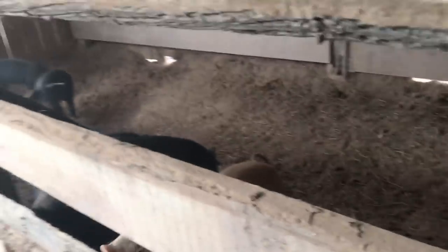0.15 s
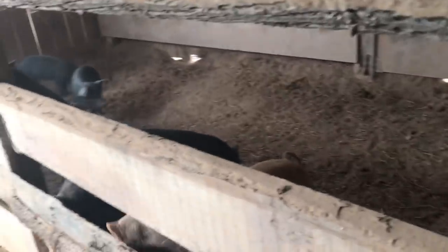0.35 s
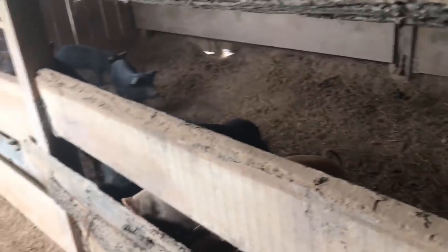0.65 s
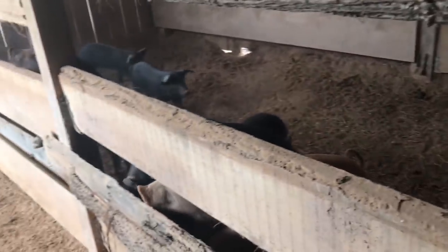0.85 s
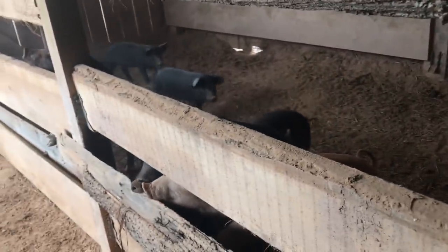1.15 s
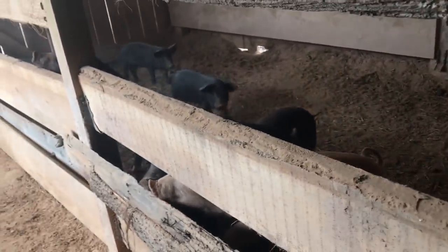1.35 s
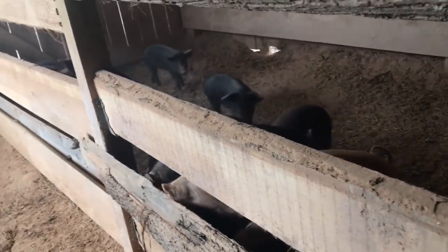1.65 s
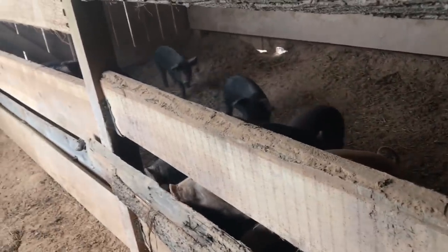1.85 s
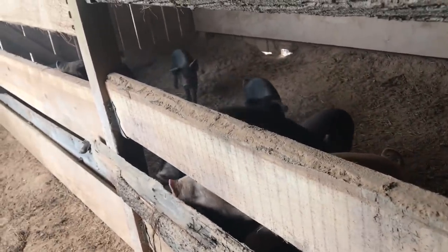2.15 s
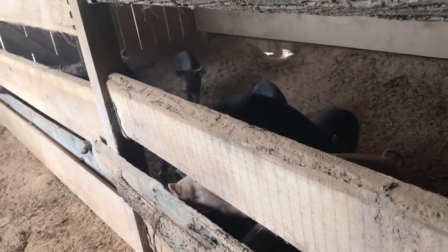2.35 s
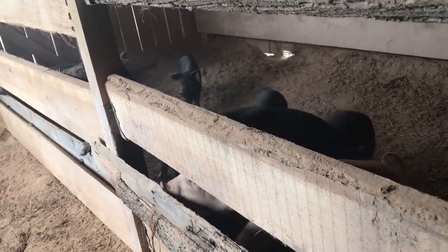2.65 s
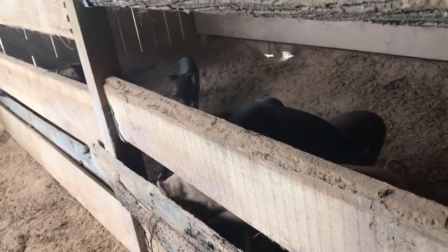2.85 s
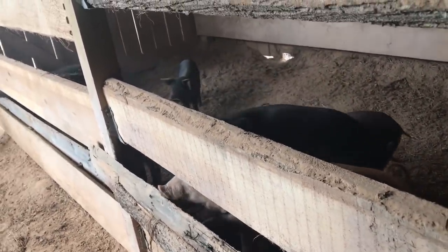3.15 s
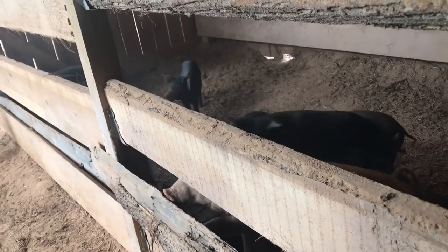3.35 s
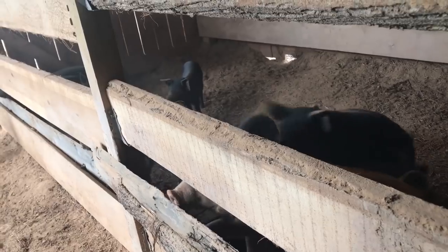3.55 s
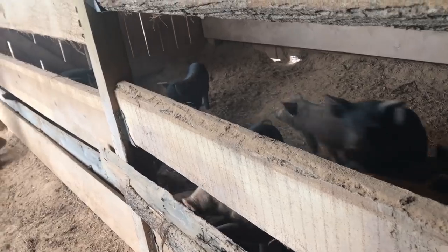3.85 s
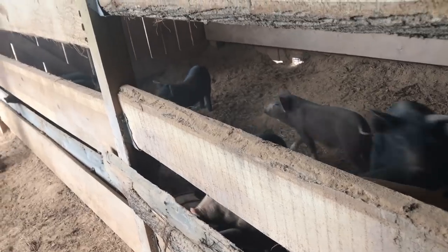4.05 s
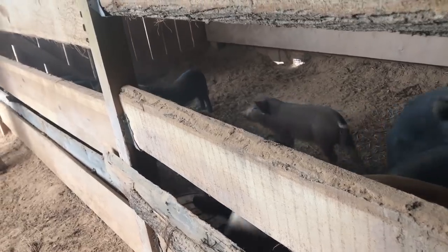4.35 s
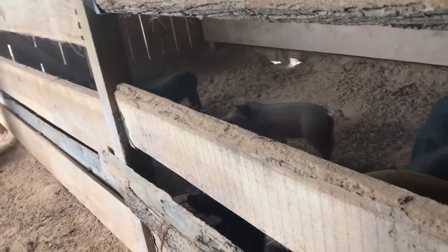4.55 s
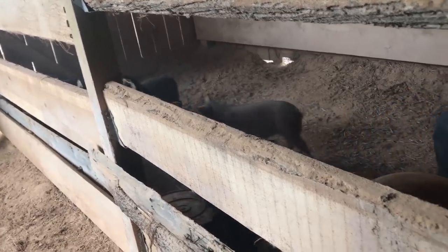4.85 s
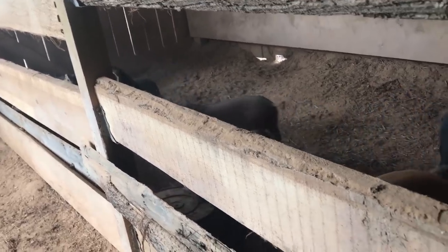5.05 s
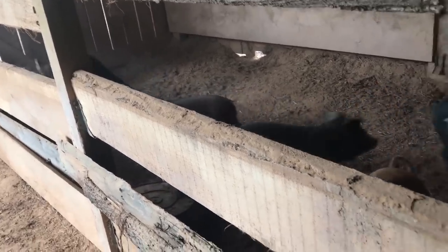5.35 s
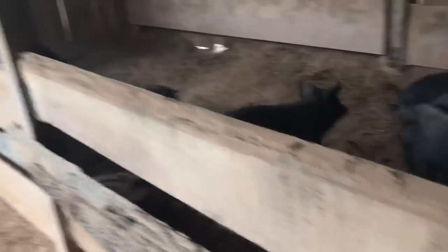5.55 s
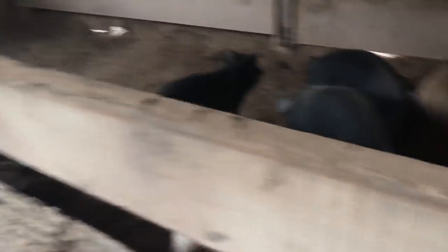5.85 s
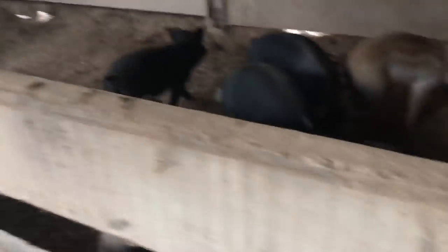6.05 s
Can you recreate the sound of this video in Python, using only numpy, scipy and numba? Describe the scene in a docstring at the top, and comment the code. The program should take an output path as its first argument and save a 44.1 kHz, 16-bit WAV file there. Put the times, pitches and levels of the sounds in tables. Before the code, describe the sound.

Several pigs in a roofed plank pen with a dirt floor. Low closed-mouth grunts and short creaky piglet grunts come in uneven bursts, with small gaps. Around four seconds the piglets whine and cry in a cluster; near five seconds one gives a quick rising squeal. Then boards are knocked hard. Trotters scuff dry dirt. A phone over the fence catches bassy gusts and faint hiss.

```python
"""Dark grunts, a gust on the microphone and a piglet's short creak open over a faint farmyard.
The scene is a roofed plank pen with a dirt floor, heard through a phone held over the fence.
Vocal-fold snaps and puffs ring nose and mouth: creaking grunts speed up to a tone, cries glide, two squeals arc.
Filtered noise makes trotters scuffing dirt, knocked boards, a shuffling herd, hiss and gusts; a thin sine squeaks.
Quick plank returns and a short noise tail put the pigs, boards and dirt in the pen."""
import sys
import numpy as np
from scipy import signal
from scipy.fft import rfft, irfft
from scipy.io import wavfile
from scipy.ndimage import uniform_filter1d
from numba import njit

SR = 44100
rng = np.random.default_rng(int(sys.argv[2]) if len(sys.argv) > 2 else 0)


def generate_wav(signal):
    """Clip the signal to [-1, 1] and save it as 16-bit WAV at the path in sys.argv[1]."""
    frames = np.transpose(np.atleast_2d(signal))
    scaled = np.clip(frames, -1, 1) * 32767
    pcm = np.round(scaled).astype(np.int16)
    wavfile.write(sys.argv[1], SR, pcm)


N = 273265
T = np.arange(N) / SR


def undb(db):
    """Decibels to gain."""
    return 10 ** (np.asarray(db) / 20)


def curves(rows, t):
    """The columns of a table, drawn as straight lines between its times and read at times t."""
    s, *columns = np.transpose(rows)
    return [np.interp(t, s, c) for c in columns]


def unit(x):
    """Scale to rms 1."""
    return x / np.sqrt(np.mean(x ** 2) + 1e-20)


def smooth(x, seconds):
    """Triangular moving average, two box averages in a row."""
    k = max(int(seconds * SR), 1)
    return uniform_filter1d(uniform_filter1d(x, k), k)


def steady(x, seconds=0.022):
    """Hold the slow level near 1 and keep the single pulses."""
    slow_power = np.abs(smooth(x ** 2, seconds))
    floor = np.mean(x ** 2) / 20 ** 2
    return x / np.sqrt(slow_power + floor)


def walk(n, rate):
    """Slow random drift with rms 1; a higher rate (Hz) drifts faster."""
    return unit(smooth(rng.standard_normal(n), 1 / rate))


def ramp(t, start, length):
    """Rise from 0 to 1 over a length of time."""
    return np.clip((t - start) / max(length, 1 / SR), 0, 1)


def add(out, t, x):
    """Mix x in from the first of its times t."""
    i = max(int(round(t[0] * SR)), 0)
    out[i:i + len(x)] += x[:max(N - i, 0)]


@njit
def band(x, hz, q):
    """State-variable band-pass whose centre moves; gain 1 at the centre."""
    y, b, low = np.empty(len(x)), 0., 0.
    for i in range(len(x)):
        g = np.tan(np.pi * min(hz[i] / SR, .45))
        v = (b + g * (x[i] - low)) / (1 + g * (g + 1 / q))
        b, low, y[i] = 2 * v - b, low + 2 * g * v, v / q
    return y


def resonate(x, modes, tuning=1, tilt_db=0):
    """Parallel resonances, each applied twice for dark valleys; the tilt (dB an octave) weights the upper ones."""
    out = 0
    for hz, width, db in modes:
        centre = np.ones(len(x)) * hz * tuning
        q = np.mean(hz) / width * np.sqrt(np.sqrt(2) - 1)  # broadened, as two passes narrow the band
        gain = undb(db + tilt_db * np.log2(hz / modes[0][0]))
        out = out + gain * band(band(x, centre, q), centre, q)
    return out


# colour of the distant farmyard noise: f/Hz, relative level/dB
YARD_COLOUR = [(20, -39), (50, 7.5), (120, -1.5), (330, -32), (600, -4), (950, -2), (1400, -5), (3000, -10),
               (6000, -18.5), (11000, -36), (15500, -54)]


def distant_yard(far_db=-66):
    """Distant farmyard: steady noise shaped in its spectrum."""
    hz, db = np.transpose(YARD_COLOUR)
    bin_hz = np.arange(N // 2 + 1) * SR / N
    colour = undb(np.interp(np.log(bin_hz + 1), np.log(hz), db))
    return unit(irfft(rfft(rng.standard_normal(N)) * colour, N)) * undb(far_db)


SWELL_ATTACK_S, SWELL_FADE_DB = 0.0025, 18.5  # quick rise; loss over the swell's listed length


def swells(rows, steady_db):
    """Gain of a steady noise with swells that rise quickly and die away; their powers add."""
    power = undb(steady_db) ** 2
    for start, length, db in rows:
        age = np.maximum(T - start, 0)
        rise = np.minimum(age / SWELL_ATTACK_S, 1)
        power = power + (rise * undb(db - SWELL_FADE_DB * age / length)) ** 2
    return np.sqrt(power)


# gusts on the microphone: start t/s, length t/s, level/dB
GUSTS = [(0, 1.7, -48.5), (.55, 0.99, -61), (2.15, 0.15, -50.5), (5.398, 0.29, -41), (5.75, 1.3, -52)]


def gusts(air_db=-81, gust_db=3):
    """Air buffets the microphone: bass noise with quick swells and a random flutter."""
    rumble = unit(resonate(rng.standard_normal(N), [(41, 28, -24), (77.0, 145, 16)]))
    return rumble * swells(GUSTS, air_db) * undb(gust_db * walk(N, 8.3))


# swells of faint high hiss: start t/s, length t/s, level/dB
HISS_SWELLS = [(2.265, 0.33, -60.5), (2.5, 1, -65), (2.82, 0.19, -62.5), (3.24, 0.26, -63),
               (4.85, 0.68, -65), (5.42, 0.3, -56.5)]


def hiss(hiss_db=-74):
    """Faint hiss: very broad high noise that swells now and then."""
    return unit(resonate(rng.standard_normal(N), [(6100, 13600, 0)])) * swells(HISS_SWELLS, hiss_db)


# the air puff after each snap: longest decay (s), and longest share of a cycle
PUFF_S, PUFF_SHARE = .0026, .24


def folds(t, start, hz, rough, jitter=.15, shimmer_db=4.5):
    """Uneven snaps of the vocal folds, and the short puff of turbulent air that follows each."""
    rate = hz * np.exp(jitter * rough * walk(len(t), 300))
    phase = np.cumsum(rate * (t >= start)) / SR
    size = undb(shimmer_db * rough * walk(len(t), 166))
    snaps = np.diff(np.ceil(phase), prepend=0) * size / np.sqrt(hz)
    decay_cycles = np.minimum(PUFF_S * hz, PUFF_SHARE)
    gate = np.exp(-(phase % 1) / decay_cycles) * (t >= start)
    return steady(snaps), steady(gate * size * rng.standard_normal(len(t)))


DARK_ROUGH, DARK_AIR = .26, .3  # roughness 0-1; puffs against snaps
# closed-mouth resonances of the bigger pigs: f/Hz, width f/Hz, relative level/dB
CHEST = [(120, 60, 15), (324, 370, -24), (880, 100, -53)]
# dark grunts: start t/s, loudest t/s, end t/s, first pitch f/Hz, last pitch f/Hz, level/dB
DARK_GRUNTS = [(0, 0.023, .11, 112.5, 98.3, -45), (0.24, 0.334, .37, 111, 108.6, -42),
               (0.098, 0.19, .26, 148.6, 112.6, -39.5), (0.321, 0.406, .48, 188.7, 101.6, -37),
               (0.58, 0.672, .72, 135.3, 97.7, -40.5), (0.966, 1.09, 1.17, 139.6, 111.6, -43),
               (1.245, 1.264, 1.312, 126.6, 115.3, -26.5), (1.323, 1.34, 1.39, 129, 111, -37.5),
               (1.72, 1.754, 1.84, 141.2, 98, -37), (2.182, 2.215, 2.31, 107.9, 96.3, -41.5),
               (3.046, 3.206, 3.3, 109.9, 99.6, -41), (3.297, 3.359, 3.44, 117.4, 104.1, -45.5),
               (3.441, 3.57, 3.6, 131, 113.3, -46), (3.587, 3.6, 3.645, 131.5, 107.5, -30),
               (3.654, 3.803, 3.83, 108, 119, -50.5), (4.201, 4.244, 4.305, 165.2, 144.6, -31.5),
               (4.95, 5.037, 5.27, 94, 98, -44.5), (5.551, 5.597, 5.72, 111, 110.4, -43),
               (6.06, 6.118, 6.24, 147.8, 104.8, -33)]


def big_pigs(fade_db=13):
    """Closed-mouth grunts: mostly falling pitch, nearly all in the lowest resonance."""
    out = np.zeros(N)
    for start, top, end, first_hz, last_hz, db in DARK_GRUNTS:
        t = np.arange(start, end, 1 / SR)
        snaps, puffs = folds(t, start, np.linspace(first_hz, last_hz, len(t)), DARK_ROUGH)
        below_top_db = np.interp(t, [start, top, end], [fade_db, 0, fade_db])
        swell = undb(db - below_top_db) * signal.windows.tukey(len(t), .15)
        add(out, t, steady(resonate(snaps + DARK_AIR * puffs, CHEST)) * swell)
    return out


THROAT_WANDER, COLOUR_FLICKER_DB = .022, 2.2  # rms drift of each centre (fraction) and of its strength


def moving(shapes, centres):
    """Resonances on their paths; each wanders a little and swells or ebbs from moment to moment."""
    modes = []
    for hz, (width, db) in zip(centres, shapes):
        path = hz * (1 + THROAT_WANDER * walk(len(hz), 40.0))
        modes.append((path, width, db + COLOUR_FLICKER_DB * walk(len(hz), 91.0)))
    return modes


SCATTER_S = 0.0018  # the snout and the boards beside it draw each snap out into a short burst
SCATTER_FULL_DB = 6  # below this echo share a piglet is close and its snaps stay sharper


def scatter(x, echo_db):
    """Spread every snap over a few milliseconds, less when the piglet is close, and keep most of its colour."""
    age = np.arange(SR // 50) / SR
    spread_s = SCATTER_S * min(undb(echo_db - SCATTER_FULL_DB), 1) ** 3
    envelope = age * np.exp(-age / spread_s) * undb(-20 * age / age[-1])
    spectrum = rfft(rng.standard_normal(len(age)) * envelope, 4 * len(age))
    burst = irfft(spectrum / np.abs(spectrum) ** .7)[:len(age)]  # flattened spectrum
    return signal.fftconvolve(x, burst / np.linalg.norm(burst))[:len(x)]


# turbulent air against fold snaps at full roughness, in each group of resonances
NOSE_AIR, MOUTH_AIR, STRAIN_AIR = .45, 2.7, 4.2
NOSE_PITCH_HZ, NOSE_LIFT = 140, 0.055  # the nose's fixed-table resonances follow the pitch, by this power
JAW_SHIFT_PER_DB = .001  # a closing jaw lowers the resonances
CREAK_TREMBLE_DB, TONE_TREMBLE_DB = 2.8, 1.1  # rms level tremble at low and at high pitch
# the moving resonances, in path order: width f/Hz, relative level/dB
NOSE = [(135, 1.5)]
MOUTH = [(227, 1.6), (202, 8.8), (264, 7.8), (249, 7.7), (212, 5.4)]
STRAIN = [(330, 5), (350, 2), (380, -2)]
# resonances without a path of their own: f/Hz, width f/Hz, relative level/dB
NOSE_LOW = [(157, 41, -0.5), (357.8, 59, 11.5), (590, 42, -9.5)]
MOUTH_TOP = [(9800, 360, -13.5), (11950, 3400, -18)]
STRAIN_TOP = [(9420, 850, -14), (13550, 1800, -23.5)]
# tongue and jaw move the throat from call to call: t/s, upper nose f/Hz, five mouth f/Hz,
# three strain f/Hz, extra ring of the fourth mouth resonance level/dB
THROAT_PATHS = [ (.29, 880, 1840, 2600, 3200, 3990, 4700, 5700, 5700, 7200, 3),
                (.52, 880, 1860, 2640, 3220, 4020, 4400, 5530, 6100, 7050, -0.5),
                (.61, 900, 1800, 2600, 3420, 3940, 4480, 5350, 5900, 7360, 3.5),
                (.83, 905, 1880, 2430, 3420, 3900, 4780, 5230, 5400, 7400, 3.5),
                (.94, 880, 1880, 2620, 3500, 3930, 5070, 5300, 5840, 7200, -0.5),
                (1.42, 883, 2060, 2450, 3260, 3870, 4300, 5200, 6000, 7050, -2.5),
                (1.62, 920, 1870, 2440, 3380, 3830, 4640, 5570, 5640, 6640, -2),
                (2.21, 880, 1900, 2444, 3264, 4380, 4500, 5450, 6900, 6930, -2),
                (3.16, 955, 1930, 2580, 3170, 3850, 4240, 5100, 5900, 6900, 3),
                (3.4, 933, 1900, 2480, 2980, 4140, 4400, 5340, 6100, 7200, 1.5),
                (3.83, 900, 1900, 2490, 3350, 4060, 4500, 5240, 6700, 7160, 7),
                (3.92, 950, 1970, 2430, 3500, 4000, 4480, 5050, 6700, 7100, 3),
                (4.02, 900, 1840, 2400, 3300, 4030, 4500, 5300, 6500, 7000, 8.5),
                (4.13, 960, 2100, 2520, 3400, 3940, 4600, 5700, 6230, 7300, 4),
                (4.25, 900, 1900, 2450, 3090, 3920, 4600, 5330, 6100, 7100, 5.5),
                (4.33, 950, 1890, 2500, 3280, 4060, 4400, 6000, 6400, 7100, 2),
                (4.39, 960, 1700, 2350, 3370, 3880, 4140, 5000, 6300, 7200, 5.5),
                (4.45, 936, 1880, 2330, 3430, 3980, 4160, 4840, 6300, 7460, 2),
                (5.05, 880, 1900, 2510, 3150, 4040, 4700, 5670, 6200, 6770, 4.5),
                (5.17, 880, 1900, 2550, 3400, 3940, 4500, 5350, 6100, 6900, 3),
                (5.47, 880, 2000, 2520, 3420, 4200, 4800, 5840, 6100, 6340, 7),
                (5.56, 880, 1900, 2360, 2700, 4000, 4750, 5960, 6360, 6700, -5),
                (6.12, 890, 1900, 2830, 3600, 3950, 4440, 5350, 6100, 6900, -5)]


def voice(t, start, hz, rough, opening_db, tension_db, tuning, tilt_db,
          jaw_tilt=0.41, strain_tilt=0.25, easy_db=-6, stop_s=0.0044):
    """Fold pulses ring the nose; an open mouth and strain add higher, airier resonances and tilt the colour."""
    snaps, puffs = folds(t, start, hz, rough)
    nose_hz, m1, m2, m3, m4, m5, s1, s2, s3, ring_db = curves(THROAT_PATHS, t)
    jaw = 1 + JAW_SHIFT_PER_DB * (opening_db - np.max(opening_db))

    lift = tuning * np.minimum(hz / NOSE_PITCH_HZ, 1.5) ** NOSE_LIFT
    nose_modes = [(f * lift, width, db) for f, width, db in NOSE_LOW] + moving(NOSE, [nose_hz])
    nose_tilt_db = jaw_tilt * np.maximum(opening_db, -6)
    nose = resonate(snaps + NOSE_AIR * rough * puffs, nose_modes, jaw, nose_tilt_db)

    mouth_modes = moving(MOUTH, [m1, m2, m3, m4, m5])
    f, width, db = mouth_modes[3]
    mouth_modes[3] = (f, width, db + ring_db)
    bursts = scatter(snaps, curves(ECHO_SHARE, np.mean(t))[0])
    mouth = resonate(bursts + MOUTH_AIR * rough * puffs, mouth_modes + MOUTH_TOP, jaw, tilt_db)

    strain_modes = moving(STRAIN, [s1, s2, s3]) + STRAIN_TOP
    strain_tilt_db = strain_tilt * (tension_db - easy_db)
    strain = resonate(bursts + STRAIN_AIR * rough * puffs, strain_modes, jaw, strain_tilt_db)

    sound = steady(nose) + steady(mouth) * undb(opening_db) + steady(strain) * undb(tension_db)
    tremble_db = np.interp(hz, [90, 140], [CREAK_TREMBLE_DB, TONE_TREMBLE_DB])
    return sound * undb(tremble_db * walk(len(t), 122)) * np.clip((t[-1] - t) / stop_s, 0, 1)


def call_times(start, length):
    """Sample times of a call, from just before its first snap."""
    return np.arange(max(start - .008, 0), start + length, 1 / SR)


CREAK_ROUGH = .08  # roughness 0-1
SWELL_DB_PER_OCT, OPENING_DB_PER_OCT = 2, 4.5  # effort speeds up the creak, swells it and opens the mouth
BREAK_S, BREAK_DB = .012, 2  # time to break into the tone, and the level the voice gains by it
FIRST_SNAPS_S = 0.028  # time for the first snaps to settle from their own level
ARCH_OCT = 0.046  # the tone bows upward in its middle
RELEASE_S, RELEASE_DB_PER_S, SAG_OCT_PER_S = 0.065, 322, 6.4  # the breath runs out: level and pitch sink
SHUT_DB_PER_S = 194  # the mouth shuts and the strain eases as the breath runs out
# piglet grunts: start t/s, creak length t/s, tone length t/s, first creak f/Hz, last creak f/Hz,
# lateness of the speed-up (1 = even), tone f/Hz before its bow, tone roughness 0-1, relative level/dB,
# softness of the first snap level/dB (negative = stronger), mouth opening level/dB,
# mouth closing over the tone level/dB (negative = opening), strain level/dB, nose tuning factor,
# mouth tilt dB an octave
GRUNTS = [ (.009, 0.0026, 0.0041, 40, 42.5, 1.3, 41, 0.19, -36, 1.5, 2, 7, -25, 1.13, -3),
          (0.245, 0.069, 0.0033, 56.4, 101.9, 0.96, 116.2, 0.6, -35.5, -1, 2, -4.5, -18.5, 1, -2),
          (.462, 0.096, 0.087, 71.55, 102.2, 1.55, 130.9, 0.42, -36, 10.5, 3.5, 4, -18, 1.08, -0.5),
          (.802, 0.053, 0.11, 68.76, 90.2, 2.18, 204.2, 0.22, -34, 3, -4, 2, -16.5, 1.05, 0),
          (1.308, 0.081, 0.0012, 55.65, 75.3, 1.13, 76.6, 0.12, -46.5, -3, 0, -11, -38, 1.38, -4),
          (1.398, 0.085, 0.12, 83.35, 102.2, 0.84, 190, 0.13, -36, 3.5, 0, 13.5, -21.5, 1.1, -1.5),
          (2.166, 0.056, 0.0051, 46, 49.2, 1.4, 44.2, 0.16, -42, -0.5, -10, -2.5, -21, 1.06, 0.5),
          (2.595, 0.0044, 0.0038, 62, 60.5, 0.81, 62, 0.21, -61, 0, 13.5, 20, 3, 1.2, 10),
          (3.081, 0.075, 0.055, 46.78, 96, 1.5, 113.2, 0.31, -37.5, 1.5, -2, 7.5, -20.5, 1.06, -4.5),
          (3.537, 0.035, 0.0035, 48.4, 72, 0.94, 73.6, 0.24, -43, -3, -13.5, -7, -25, 0.99, -11),
          (3.787, 0.0036, 0.0042, 45, 45.7, 1.1, 46.5, 0.37, -45, -0.5, -7.5, -9, -24, 1.05, -5),
          (3.811, 0.038, 0.073, 73.3, 104.9, 0.99, 176.3, 0.47, -40, 1, 0.5, 3, -15, 0.99, -3),
          (4.706, 0.048, 0.0098, 63.7, 88.3, 0.97, 85.2, 0.31, -43.5, 3.5, -5, 2, -27, 0.99, -4),
          (4.947, 0.037, 0.0088, 46, 66.5, 2.15, 107.2, 0.21, -37, 11, -2, -4.5, -4.5, 1.01, -1),
          (5.096, 0.092, 0.019, 50.9, 60.53, 0.82, 61.9, 0.39, -43.5, -2, -7, 1.5, -22, 1.06, -1),
          (5.404, 0.108, 0.002, 53, 64.14, 2.32, 64.2, 0.14, -39.5, 3, 3, 8, -1.5, 1.02, -1.5)]


def grunt(start, creak_s, tone_s, first_hz, last_hz, lateness, tone_hz, tone_rough, db, soft_db,
          opening_db, closing_db, strain_db, tuning, tilt_db):
    """A creak changes pace, breaks into a tone while the mouth moves, then sags and fades."""
    t = call_times(start, creak_s + tone_s + RELEASE_S)
    slack_oct = np.log2(last_hz / first_hz) * (1 - ramp(t, start, creak_s) ** lateness)
    broken, held = ramp(t, start + creak_s, BREAK_S), ramp(t, start + creak_s, tone_s)
    spent_s = np.maximum(t - start - creak_s - tone_s, 0)

    creak = last_hz * 2 ** -slack_oct
    tone = tone_hz * 2 ** (ARCH_OCT * (np.sin(np.pi * held) - .5))
    hz = ((1 - broken) * creak + broken * tone) * 2 ** (-SAG_OCT_PER_S * spent_s)
    rough = (1 - broken) * CREAK_ROUGH + broken * tone_rough

    shut_db = SHUT_DB_PER_S * spent_s
    mouth_db = opening_db - OPENING_DB_PER_OCT * slack_oct - closing_db * held - shut_db
    easing_db = soft_db * (1 - ramp(t, start, FIRST_SNAPS_S) ** 2)
    effort_db = BREAK_DB * (broken - 1.5) - SWELL_DB_PER_OCT * slack_oct
    gain = undb(db - easing_db + effort_db - RELEASE_DB_PER_S * spent_s)
    return t, gain * voice(t, start, hz, rough, mouth_db, strain_db - shut_db, tuning, tilt_db)


STIR_DB, SETTLE_S, RESTING_DB = -10, 0.062, -70.5  # the herd stirs with each call, then settles
SHUFFLE_WAVER_DB = 1.8


def stirring(pigs):
    """Gain of the shuffling: it rises with the voices and dies away after them."""
    keep = np.exp(-1 / (SETTLE_S * SR))
    unrest = signal.lfilter([1 - keep], [1, -keep], pigs ** 2)
    return np.sqrt(unrest * undb(STIR_DB) ** 2 + undb(RESTING_DB) ** 2)


def shuffle(pigs):
    """The shuffling herd: low resonant noise that wavers and follows the voices."""
    modes = [(94.0, 19, -17), (121.4, 35.6, 3.0), (189.3, 33, 4.5),
             (335.6, 107, 1.5), (530, 210, -15.0), (865, 50, -10.0)]
    noise = unit(resonate(rng.standard_normal(N), modes))
    return noise * stirring(pigs) * undb(SHUFFLE_WAVER_DB * walk(N, 38))


# resonances of the dirt floor: f/Hz, width f/Hz, relative level/dB
DIRT = [(172, 166, 10.5), (312, 97, 6), (579, 79, 8.5), (1054, 286, 0), (1445, 870, -1.5),
        (2550, 2700, -18)]
# trotters in the dirt: start t/s, nominal length t/s, relative level/dB
SCUFFS = [(0.088, 0.038, -48.5), (0.107, 0.055, -46), (0.178, 0.05, -43), (0.531, 0.046, -43.5),
          (1.055, 0.0074, -44), (1.075, 0.11, -57), (1.176, 0.056, -53.5), (2.596, 0.017, -51),
          (2.81, 0.076, -46), (2.845, 0.042, -42.5), (2.878, 0.12, -51), (3.138, 0.028, -48),
          (3.288, 0.049, -58), (3.463, 0.17, -60), (3.593, 0.027, -46.5), (3.6, 0.32, -62.5),
          (4.768, 0.038, -47.5)]


def scuffs(grain_db=2.5, rise=0.43):
    """Trotters drag through dry dirt: gritty noise bursts that peak at a share (rise) of their length."""
    grit = np.zeros(N)
    for s, length, db in SCUFFS:
        age = np.arange(int(2 * length * SR)) / SR
        push = age / (rise * length)
        grains = unit(rng.standard_normal(len(age)) * undb(grain_db * walk(len(age), 220)))
        add(grit, s + age, undb(db) * push * np.exp(1 - push) * grains)
    dirt_gain = np.std(resonate(rng.standard_normal(N), DIRT))
    return resonate(grit, DIRT) / dirt_gain


CRY_ATTACK_S, CRY_RELEASE_S, CRY_FADE_DB = 0.035, 0.042, 7  # a cry swells in and fades out by this much
# piglet cries voiced at once, without a creak: start t/s, length t/s, first f/Hz, last f/Hz, roughness 0-1,
# relative level/dB, mouth opening level/dB, strain level/dB, nose tuning factor, mouth tilt dB an octave
CRIES = [ (1.644, 0.037, 199.6, 180.3, 0.55, -32, -5.5, -14.5, 0.94, 1),
         (1.712, 0.11, 149.6, 103.6, 0.59, -48.5, -5, -13.5, 0.88, -6.5),
         (2.506, 0.089, 91.4, 133.6, 0.83, -50.5, -11.5, -33, 1.07, -12),
         (2.596, 0.11, 452, 495, 0.11, -54.5, -7, -14, 1.22, -11),
         (3.35, 0.086, 131.3, 134.6, 0.73, -40, -8, -15, 0.99, -7),
         (3.927, 0.071, 364, 323, 0.23, -44.5, 4, -7.5, 0.94, -4),
         (3.993, 0.097, 330, 337.6, 0.98, -51, 4, -10, 1.14, -3),
         (4.054, 0.12, 334, 357, 0.29, -40, -6.5, -10, 1.09, -14),
         (4.17, 0.12, 205.3, 182.7, 0.61, -41.5, -2, -11.5, 1, -1),
         (4.266, .14, 125.5, 173.9, 0.5, -44, 5.5, -5, 1.05, -2),
         (4.386, .116, 225.9, 164.5, .4, -42, 3.5, -6, 0.95, -3.5),
         (4.535, 0.055, 120, 98.8, 0.54, -49.5, -10, -15, 1, -8),
         (4.853, 0.21, 381, 371, 0.7, -49, -3.5, -13.5, 0.91, -9),
         (5.21, 0.13, 117.8, 115.6, 0.46, -49, -8.5, -19, 1.03, 0),
         (5.519, 0.076, 160, 165.1, 0.45, -39.5, 0, -4, 1.046, -8),
         (6.056, 0.14, 153.8, 115.6, 0.39, -50, -6.5, -12, 1.02, 1.5)]


def cry(start, length, first_hz, last_hz, rough, db, opening_db, strain_db, tuning, tilt_db):
    """One glide of pitch that swells in and fades."""
    t = call_times(start, length)
    hz = first_hz + (last_hz - first_hz) * ramp(t, start, length)
    fade_in = 1 - ramp(t, start, CRY_ATTACK_S)
    fade_out = ramp(t, start + length - CRY_RELEASE_S, CRY_RELEASE_S)
    gain = undb(db - CRY_FADE_DB * (fade_in + fade_out))
    return t, gain * voice(t, start, hz, rough, opening_db, strain_db, tuning, tilt_db)


# thin faint squeaks: start t/s, end t/s, first f/Hz, last f/Hz, peak level/dB
SQUEAKS = [(3.512, 3.603, 5400, 5430, -62)]


def squeaks(waver=0.016):
    """A thin whistle: a sine with a random waver in its pitch."""
    out = np.zeros(N)
    for start, end, first_hz, last_hz, db in SQUEAKS:
        t = np.arange(start, end, 1 / SR)
        hz = np.linspace(first_hz, last_hz, len(t)) * (1 + waver * walk(len(t), 270))
        whistle = np.sin(2 * np.pi * np.cumsum(hz) / SR)
        add(out, t, undb(db) * whistle * signal.windows.tukey(len(t), .5))
    return out


# colour of the first contact of a knock: f/Hz, width f/Hz, relative level/dB
CRACK = [(1435, 284, 4.5), (1900, 1460, -24.5)]
# ringing of the boards: f/Hz, width f/Hz, relative level/dB before the rattle tilt
BOARD = [(160, 182, 9.5), (330, 240, 4), (530, 140, -9.5), (900, 150, 11), (1007, 102, 6), (1400, 78, -2.5),
         (1970, 160, -30)]
# knocks on the boards: t/s, relative level/dB
KNOCKS = [(3.590, -46.5), (5.397, -28.5), (5.409, -36), (5.711, -35), (5.731, -46), (5.764, -52.5),
          (5.910, -43.5), (5.93, -48), (6.037, -44.5), (6.063, -52)]


def knocks(t60=0.32, crack_s=0.003, crack=1.18, rattle_tilt_db=-0.5, build_s=0.0054):
    """A blow on a loose plank: a short bright crack, then the fence takes it up and rattles out."""
    out, age = np.zeros(N), np.arange(SR // 2) / SR
    for s, db in KNOCKS:
        contact = steady(resonate(rng.standard_normal(len(age)), CRACK), 0.004)
        contact = contact * crack * np.exp(-age / crack_s)
        rattle = unit(resonate(rng.standard_normal(len(age)), BOARD, tilt_db=rattle_tilt_db))
        rattle = rattle * undb(-60 * age / t60) * ramp(age, 0, build_s)
        add(out, s + age, undb(db) * (contact + rattle) * ramp(age, 0, 0.00076))
    return out


# squeals, one curve each: t/s, pitch f/Hz, roughness 0-1, relative level/dB, mouth opening level/dB,
# strain level/dB
SQUEALS = [
    [(4.07, 812.5, 0.3, -57, -4, -12), (4.105, 1013, 0.25, -46.5, 9.5, 3), (4.135, 1077, 0.38, -49, 5, -12),
     (4.17, 999, 0.63, -52, 12, 6), (4.2, 880, 0.25, -49, 5, 9)],
    [(5.002, 641, 0.44, -40, -1, -8), (5.02, 771, 0.3, -38.5, -0.5, 4), (5.034, 863, 0.21, -34, 1.5, 2),
     (5.044, 939, .21, -33.5, -0.5, 4), (5.058, 988, .42, -44.5, 10.5, 11),
     (5.075, 1011, 0.54, -40, 11, 12.5), (5.091, 684, .6, -39, -6, -16)],
]


def squeal(curve, tuning=0.92, tilt_db=1.5):
    """A strained voice climbs in pitch, roughens into a screech and drops."""
    start = curve[0][0]
    t = call_times(start, curve[-1][0] - start)
    hz, rough, db, opening_db, strain_db = curves(curve, t)
    return t, undb(db) * voice(t, start, hz, rough, opening_db, strain_db, tuning, tilt_db)


# echoes from the nearest planks: delay t/s, level/dB
PLANKS = [(.0014, -25.5), (.0036, -18.5), (.0061, -55), (.0097, -20.5)]


def pen(x, low_db=-9, high_db=-15, low_t60=0.35, high_t60=0.33, split_hz=1100):
    """The echo of the pen: quick returns from planks and a short tail under the roof, stronger in the bass."""
    age = np.arange(SR // 2) / SR
    response = np.zeros(len(age))
    for side, db, t60 in (("low", low_db, low_t60), ("high", high_db, high_t60)):
        tail = rng.standard_normal(len(age)) * undb(-60 * age / t60) * np.clip(age / 0.0031, 0, 1)
        split = signal.butter(2, split_hz, side, fs=SR, output="sos")
        response += undb(db) * signal.sosfilt(split, tail / np.linalg.norm(tail))
    for delay, db in PLANKS:
        response[int(delay * SR)] += undb(db)
    return signal.fftconvolve(x, response)[:N]


# drive into the pen echo; it drops as the piglets come close to the fence: t/s, level/dB
ECHO_SHARE = [(0, 5.5), (.9, 5.5), (1.6, 7.5), (2.2, 9), (3.1, 7), (4.3, 9), (4.85, 8.5), (4.96, 2),
              (5.6, 1), (5.9, 12)]


def piglets(trim_db=-2.5):
    """All the grunts, cries and squeals; each comes from another spot in the pen and has its own echo."""
    out = np.zeros(N)
    calls = [grunt(*row) for row in GRUNTS]
    calls += [cry(*row) for row in CRIES]
    calls += [squeal(curve) for curve in SQUEALS]
    for t, sound in calls:
        add(out, t, sound)
        add(out, t, pen(sound * undb(curves(ECHO_SHARE, t)[0])))
    return out * undb(trim_db)


def scene():
    """Pigs, boards and dirt sound in the pen, over yard, herd, hiss and gusts."""
    calls, grunts = piglets(), big_pigs()
    others = grunts + squeaks() + knocks() + scuffs()
    background = distant_yard() + shuffle(calls + grunts) + hiss() + gusts()
    return (calls + others + pen(others) + background)[None]


TOP_HZ = 15800


def record(dry):
    """The phone cuts the top with a steep low-pass."""
    return signal.sosfilt(signal.ellip(10, .2, 70, TOP_HZ, fs=SR, output="sos"), dry)


dry = scene()
out = record(dry)
generate_wav(out)
```